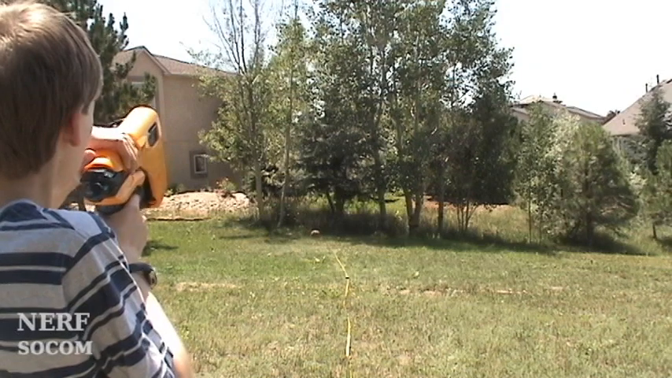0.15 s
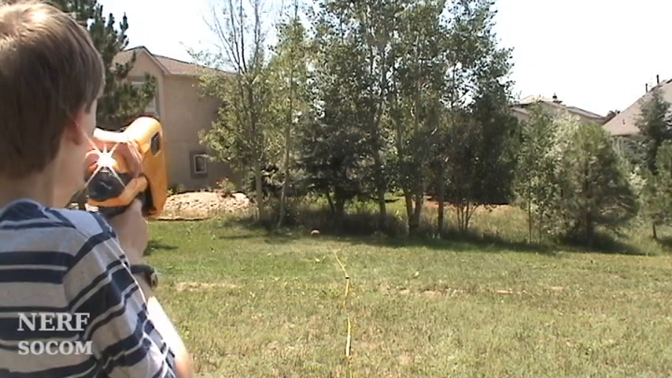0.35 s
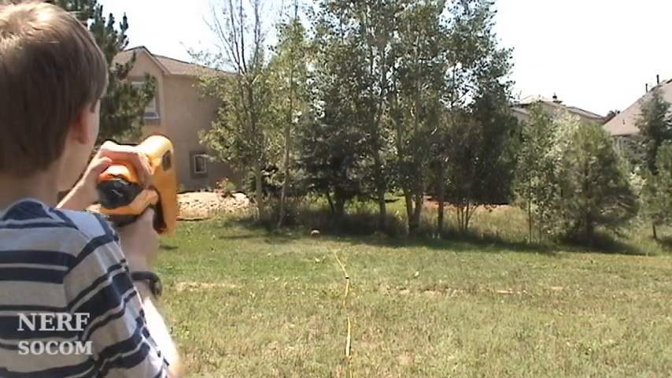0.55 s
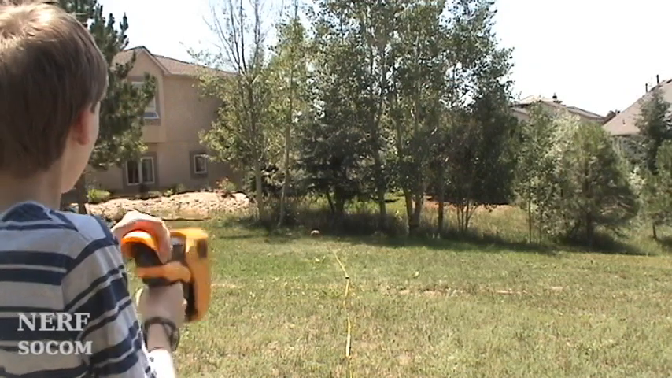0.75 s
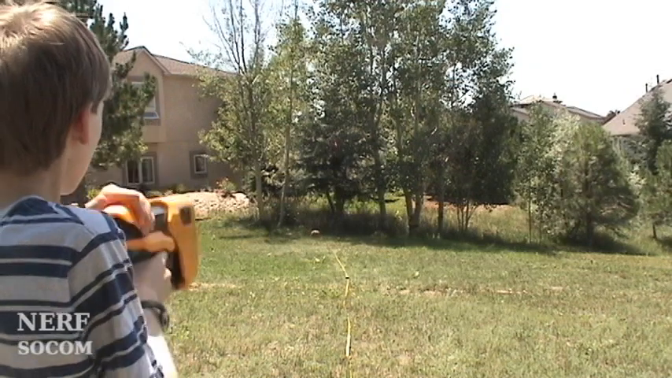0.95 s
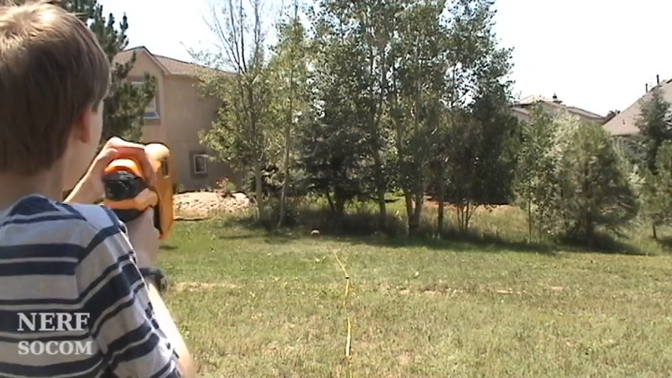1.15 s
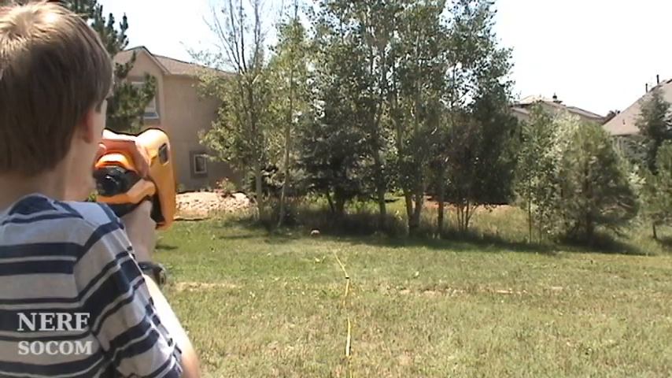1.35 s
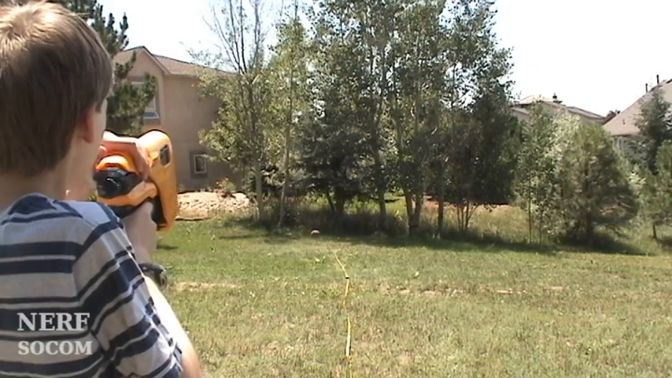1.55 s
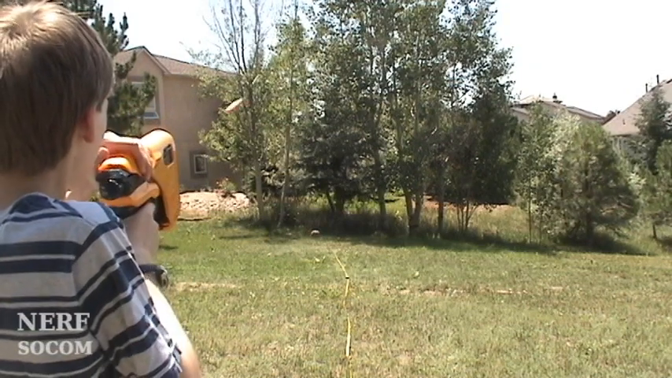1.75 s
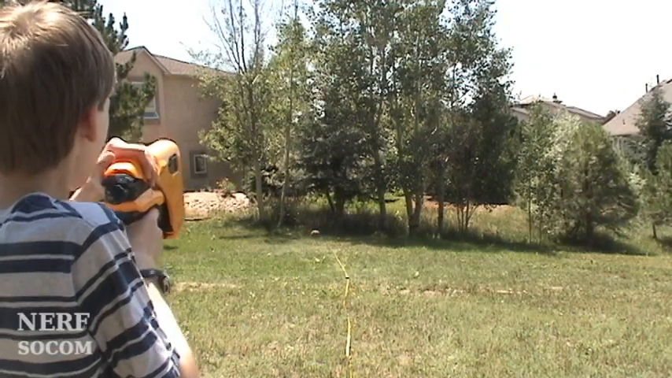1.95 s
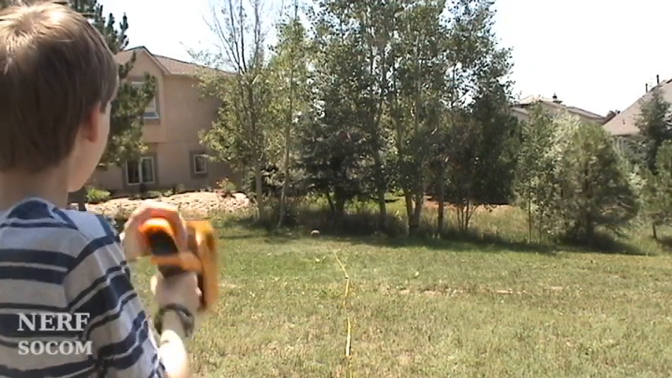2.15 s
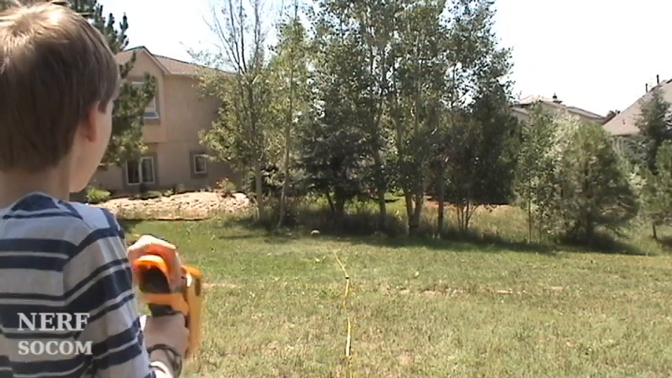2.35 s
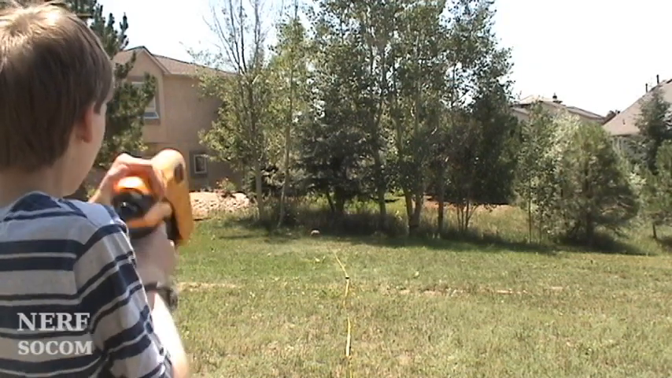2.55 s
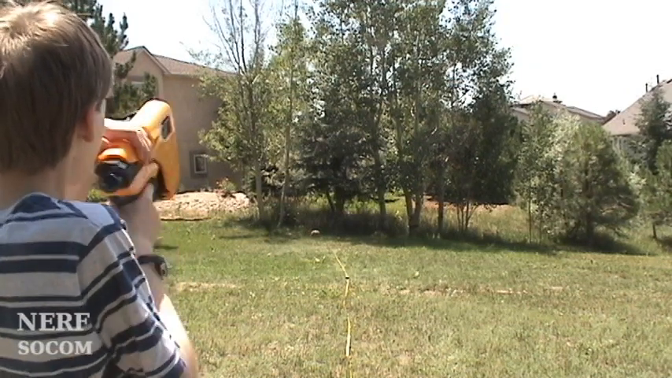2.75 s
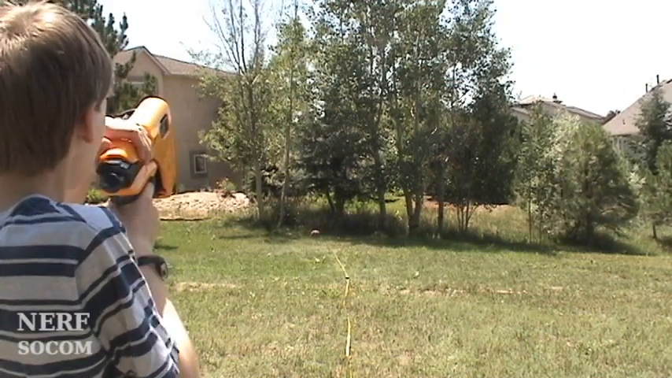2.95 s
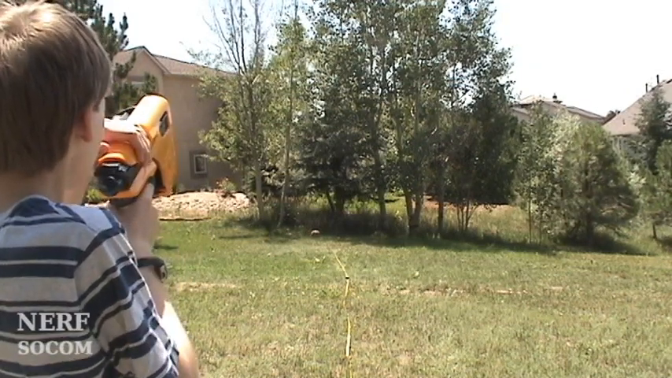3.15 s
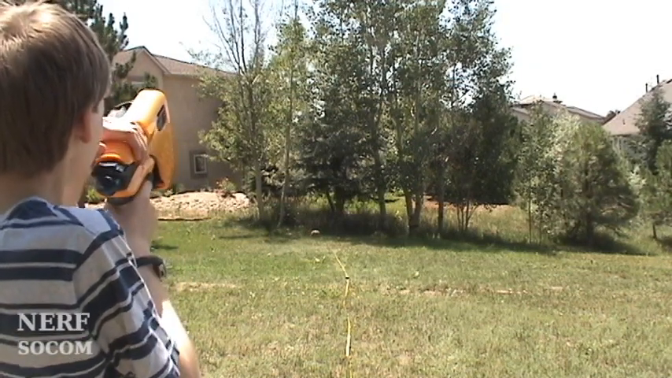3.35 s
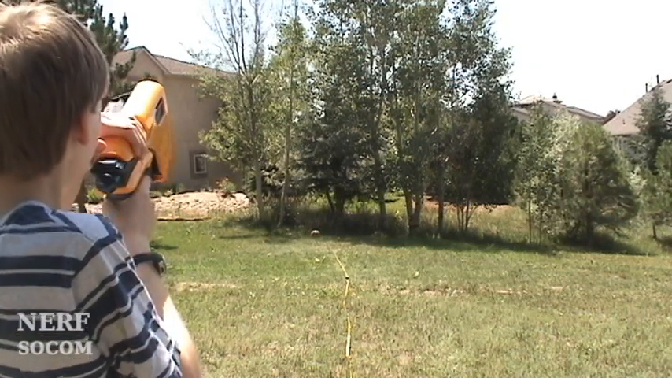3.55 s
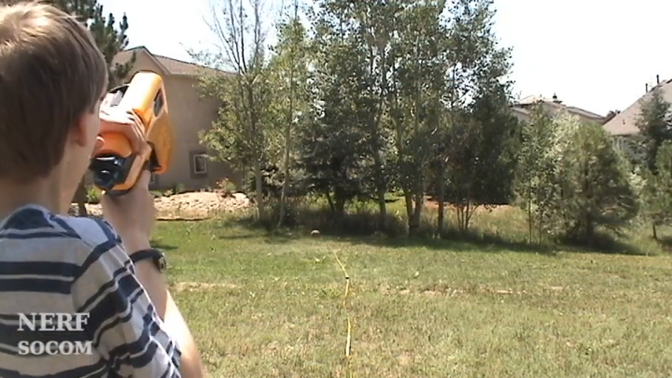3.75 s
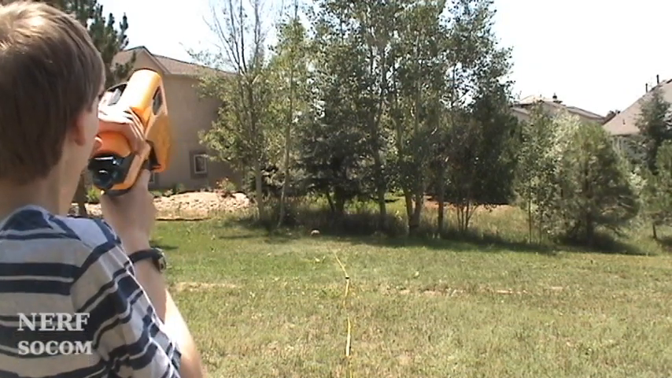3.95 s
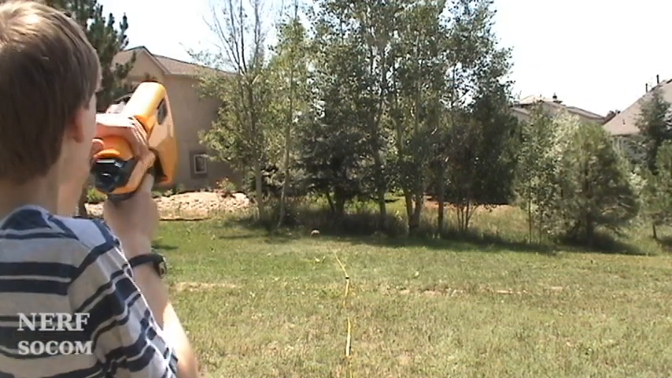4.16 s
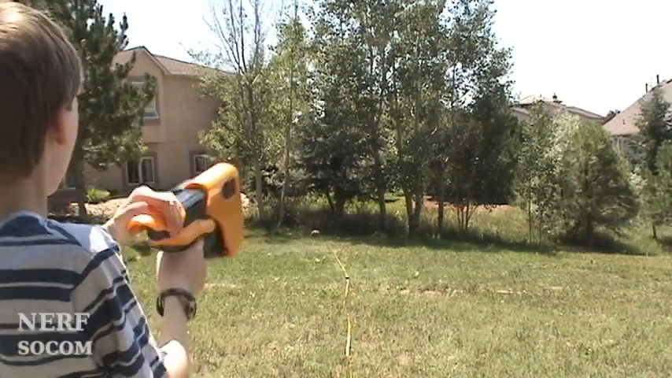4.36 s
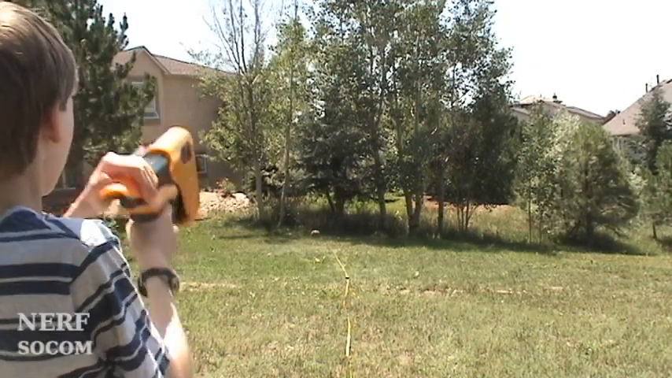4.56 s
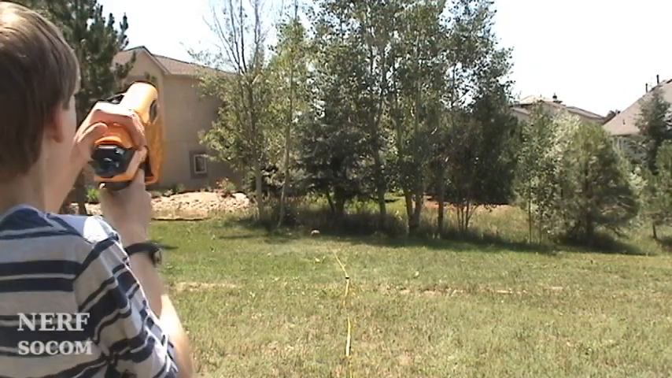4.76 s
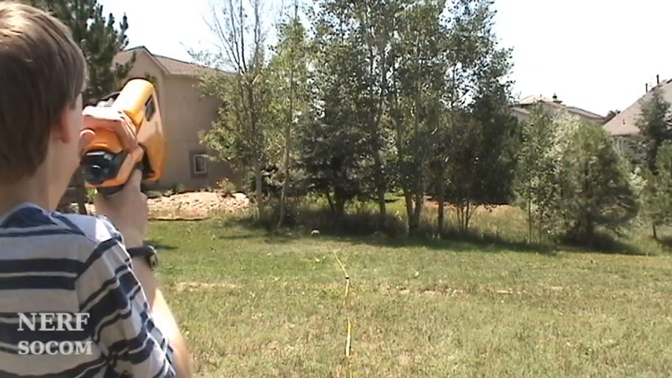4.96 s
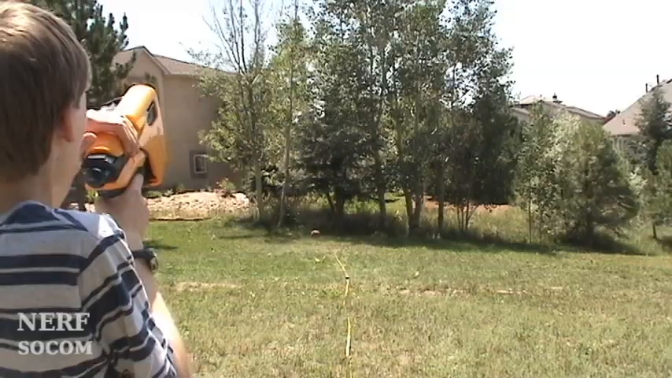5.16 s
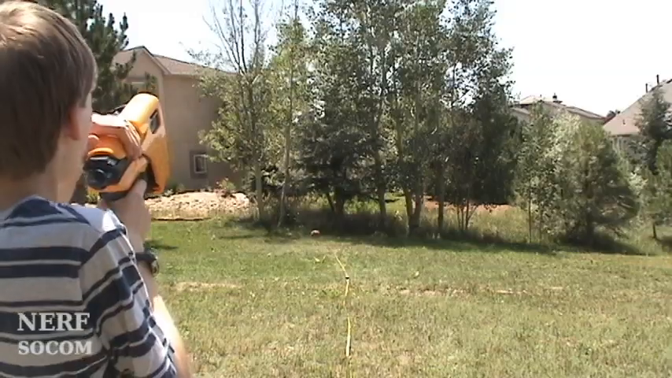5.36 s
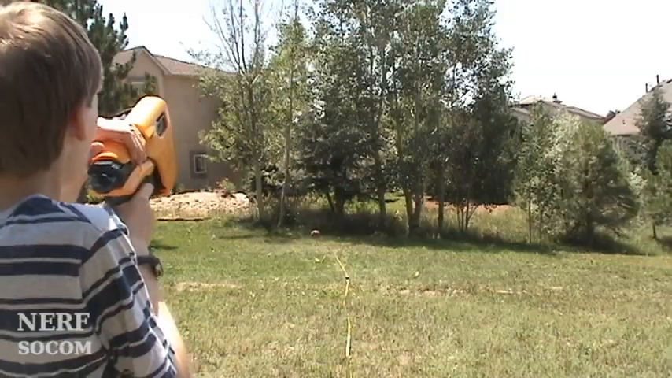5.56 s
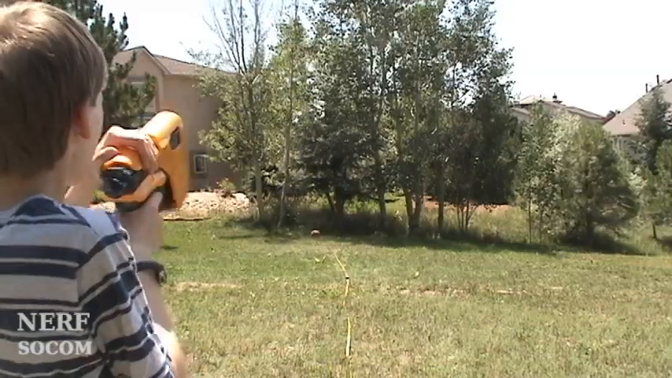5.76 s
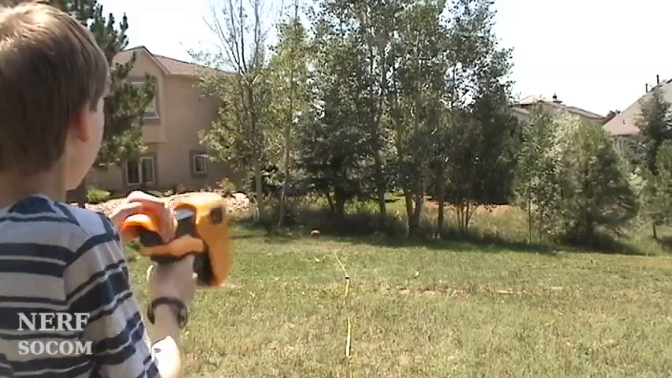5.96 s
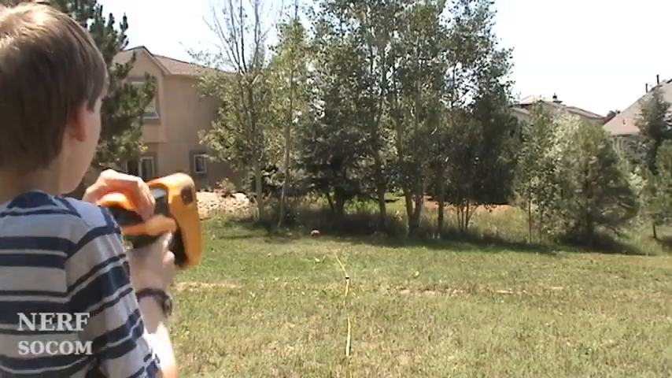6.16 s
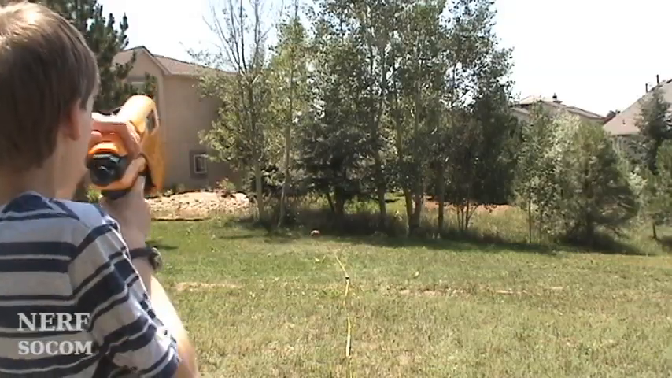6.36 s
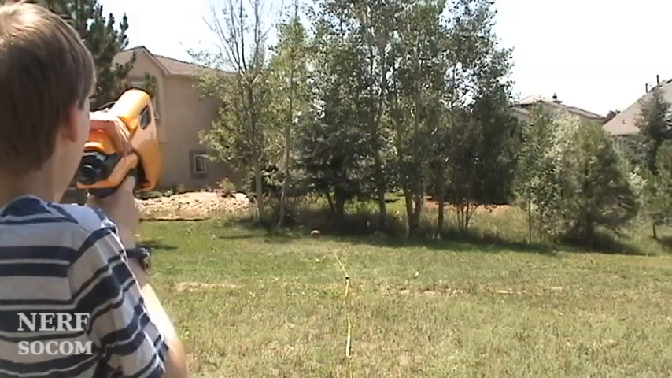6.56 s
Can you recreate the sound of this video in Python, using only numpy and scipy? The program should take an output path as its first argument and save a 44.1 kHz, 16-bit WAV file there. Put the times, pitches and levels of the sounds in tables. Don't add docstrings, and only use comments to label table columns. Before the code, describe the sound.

Outdoors on a grassy yard, a hollow toy blaster snaps hard, its trigger clicks free, and the slide ratchets back and then forward with rattling plastic scrapes and stops. The cycle happens four times, with a longer quiet pause after the second. Some foam darts leave a very faint wavering whistle. Close camera microphone, low wind buffeting, distant engine rumble, a soft fan-like drone and light hiss.

```python
import sys
import numpy as np
from scipy import signal
from scipy.fft import rfft, irfft
from scipy.io import wavfile
from scipy.ndimage import uniform_filter1d

SR = 44100
rng = np.random.default_rng(int(sys.argv[2]) if len(sys.argv) > 2 else 0)


def transcribe(u):
    v = np.clip(np.atleast_2d(u).T, -1, 1)
    q = np.round(v * 32767).astype(np.int16)
    wavfile.write(sys.argv[1], SR, q)


def makeup_ratio(level_db):
    decades = np.asarray(level_db, float) / 20
    return 10 ** decades


N = 291060

# release in seconds, crack in dB, shell in dB, hiss in dB.
SHOTS = [
    (0.2086, -11, -18.5, -47),
    (1.7272, -9, -11.5, -49),
    (3.8741, -9.5, -13, -49),
    (5.4958, -9.5, -10.5, -51),
]
# hand grabs, slide meets the spring, slide hits the stop, all in seconds.
PULLS = [
    (0.612, 0.666, 0.709),
    (2.132, 2.168, 2.2007),
    (4.263, 4.311, 4.353),
    (5.826, 5.873, 5.9197),
]
# hand grabs, slide meets the drum, slide hits the stop, all in seconds.
PUSHES = [
    (1.008, 1.039, 1.09),
    (2.507, 2.534, 2.5758),
    (4.623, 4.654, 4.6924),
    (6.2065, 6.229, 6.2779),
]
# time in seconds, click in dB, edges in dB.
LET_GO = [
    (0.381, -29.5, -43),
    (1.886, -31.5, -45),
    (4.0252, -24, -36),
    (5.698, -23.5, -30.5),
]
CREEP_S, OVERRUN_S = 0.032, 0.0053
BITE_S = 0.009


def unit(x):
    return x / np.sqrt(np.mean(x ** 2))


def colour(x, points):
    size = 8192
    hz, db = np.transpose(points)
    bins_hz = np.arange(size // 2 + 1) * SR / size
    log_gain = np.interp(np.log(bins_hz + 1), np.log(hz), db) * np.log(10) / 20
    cepstrum = irfft(log_gain)
    cepstrum[1:size // 2] *= 2
    cepstrum[size // 2 + 1:] = 0
    response = irfft(np.exp(rfft(cepstrum)))
    return signal.fftconvolve(x, response)[:len(x)]


def resonate(x, hz, width_hz):
    return signal.lfilter(*signal.iirpeak(hz, hz / width_hz, SR), x)


def walk(rate):
    hold = int(SR / rate)
    steps = np.repeat(rng.standard_normal(N // hold + 1), hold)
    return unit(uniform_filter1d(uniform_filter1d(steps, hold), hold)[:N])


def played(tables, silent):
    t = np.arange(N) / SR
    out = np.outer(silent, np.ones(N))
    for rows in tables:
        s, *columns = np.transpose(rows)
        inside = (t >= s[0]) & (t <= s[-1])
        out[:, inside] = [np.interp(t[inside], s, c) for c in columns]
    return out


def add(track, s, sound):
    start = int(s * SR)
    track[start:start + len(sound)] += sound[:N - start]


def ring(t60, rise_s):
    t = np.arange(int(.12 * SR)) / SR
    return (1 - np.exp(-t / rise_s)) * np.exp(-np.log(1000) * t / np.clip(t60, .004, .2))


def blaster():
    # frequency in Hz, level in dB.
    panel_tint = [(900, -6), (1300, -0.5), (1900, -1), (2700, 1), (3300, -1), (4200, -8), (5200, -28),
                  (6500, -61)]
    edge_tint = [(4500, -68), (5800, -22), (7000, -5), (8600, 3), (10000, 4), (11800, 5), (13500, -2),
                 (15500, -3.5), (17500, -20)]
    # frequency in Hz, width in Hz, level in dB.
    panel_modes = [(1316, 280, -7.5), (1640, 70, -7.5), (1880, 290, -7), (2690, 62, -14), (3152, 220, -14),
                   (3430, 68, -14)]
    shell_modes = [(450, 67, -8), (580, 86, 5.5), (714, 135, -3.5), (1030, 37, -10)]
    # frequency in Hz, level in dB.
    padded = [(700, 5), (1800, 0), (4500, -4)]

    slips = strokes() * makeup_ratio(2.2 * walk(330) + .8)
    grains = rng.standard_normal((3, N)) * makeup_ratio(1.05 * rng.exponential(size=(3, N)))
    hits, blows = strikes()
    panel_hits, edge_hits = ticks(hits)
    panel_touches, edge_touches = ticks(handling(), slow=1.3)

    panel_gain = 1 / np.std(colour(grains[0], panel_tint))
    edge_gain = 1 / np.std(colour(grains[1], edge_tint))
    touched = colour(grains[0] * panel_touches, padded)
    panels = panel_gain * colour(grains[0] * (slips[0] + panel_hits) + touched, panel_tint)
    modes = sum(makeup_ratio(db) * resonate(panels, hz, width) for hz, width, db in panel_modes)
    panels = makeup_ratio(-3) * (.75 * panels + 1.6 * modes)
    edges = edge_gain * colour(grains[1] * (slips[1] + edge_hits + edge_touches), edge_tint)

    push = unit(grains[2]) * (slips[2] * makeup_ratio(12) + (panel_hits + panel_touches) * makeup_ratio(10.5))
    shell = sum(makeup_ratio(db) * resonate(push, hz, width) for hz, width, db in shell_modes)
    shell = shell + makeup_ratio(3) * resonate(push, 460, 16)
    shell = colour(shell, [(150, -36.0), (330, -1.0), (420, -0.5)])
    return panels + edges + shell + thuds(blows)


def strikes():
    # time in seconds, panels in dB, edges in dB.
    catches = [(0.2198, -13.5, -24), (0.2502, -34, -28), (0.6233, -28, -24.5), (0.6384, -27, -29),
               (0.6725, -28, -28), (0.7026, -37, -18), (0.727, -27, -64), (0.9971, -36, -48),
               (1.039, -26, -30), (1.0535, -14, -27), (2.209, -18, -24), (2.1548, -20, -27),
               (2.164, -22, -32), (2.173, -29, -21), (2.493, -31, -45), (2.524, -27, -36),
               (2.5494, -28, -31), (3.913, -38, -32), (4.2735, -26, -21.5), (4.312, -15, -22),
               (4.322, -22, -12), (4.3413, -18, -13), (4.3445, -15, -26), (4.367, -27, -37),
               (4.637, -30, -29), (5.847, -21, -28), (5.881, -23, -21), (5.9088, -22, -16),
               (6.234, -24, -31), (6.2729, -19, -18)]
    # time in seconds, peak in dB, pitch in Hz.
    knocks = [(0.222, -20, 570), (3.8868, -18, 400), (1.736, -19, 430), (0.2485, -19.5, 446),
              (0.6477, -20.5, 640), (0.6701, -24, 745), (0.8712, -33, 480), (1.0554, -20, 760),
              (1.7396, -16, 813), (2.1429, -26, 660), (2.1682, -14.5, 482), (2.2259, -27, 684),
              (2.3602, -36, 485), (2.54, -21, 553), (2.5484, -17.5, 440), (2.567, -15, 474),
              (4.2861, -20, 625), (4.2986, -21, 595), (4.3144, -15, 710), (4.6367, -20.5, 580),
              (4.6658, -12.5, 634), (5.8365, -25, 465), (5.8583, -20, 646), (5.874, -16, 549),
              (5.9094, -16, 562), (5.9782, -27, 640), (5.9952, -24, 484), (6.2375, -23, 490),
              (6.2486, -18, 650), (6.2584, -17, 622)]
    # seconds after release, panels and edges in dB over the crack.
    shot_strikes = [
        (0, -4, 0),
        (0.0055, -1.5, -1.5),
        (0.0142, 2.5, -5),
        (0.028, -5.5, -8),
    ]
    # seconds after release, dB over the shell level, pitch in Hz.
    shot_blows = [
        (0.012, -6, 620),
        (0.021, 2.5, 570),
    ]
    stop_edge_db, stop_shell_db = -6, -17.5
    chatter_db, scatter_db, chatter_edge_db, chatter_shell_db = 1, 4, 2, -7

    hits, blows = list(catches), list(knocks)
    for s, crack_db, shell_db, _ in SHOTS:
        hits += [(s + late, crack_db + panel_db, crack_db + edge_db) for late, panel_db, edge_db in shot_strikes]
        blows += [(s + late, shell_db + db, hz) for late, db, hz in shot_blows]
    for (grab, load, stop), (glide_db, load_db, stop_db, stop_hz), stages, hand, latch in slides():
        latch_s = stop - latch[0]
        hits += [(grab, *hand[:2]), (latch_s, *latch[1:3]), (stop, stop_db, stop_db + stop_edge_db)]
        blows += [(grab + 0.00174, *hand[2:]), (latch_s, *latch[3:]), (stop, stop_shell_db, stop_hz)]
        for place, size, tone in rng.random(size=(12, 3)):
            s = grab - CREEP_S + place * (stop - grab + CREEP_S)
            first, last, treble, _ = stages[int(s > grab) + int(s > load)]
            effort_db = load_db if s > load else glide_db
            db = effort_db + (first + last) / 2 + chatter_db + scatter_db * (2 * size - 1)
            hits += [(s, db, db + treble + chatter_edge_db)]
            blows += [(s + 0.00202, db + chatter_shell_db, np.interp(tone, [0, 1], (465, 748)))]
    return hits, blows


def ticks(hits, slow=1):
    t60_s = 0.011
    panels, edges = np.zeros(N), np.zeros(N)
    for s, panel_db, edge_db in hits:
        soft = slow * np.clip((-26 - panel_db) / 9, 1, 2.5)
        add(panels, s, makeup_ratio(panel_db - 0.5) * ring(1.47 * soft * t60_s, 0.001 * soft ** 2))
        add(edges, s, makeup_ratio(edge_db - 1.5) * ring(soft * t60_s, .0001 * soft ** 2))
    return panels, edges


def thuds(blows):
    thud_t60_s = 0.028
    slam_late_s, slam_db, slam_hz, slam_t60_s = 0.0126, -7.5, 206, 0.046
    bump_db, bump_hz, bump_t60_s = -27, 250, 0.041
    out, t = np.zeros(N), np.arange(int(.12 * SR)) / SR
    chance = rng.random((len(blows), 2))
    for (s, db, hz), (spread, sign) in zip(blows, chance):
        upper_hz = (1.254 + 0.41 * spread) * hz
        pair = np.sin(2 * np.pi * hz * t) + 0.47 * np.sin(2 * np.pi * upper_hz * t)
        add(out, s, np.sign(sign - .5) * makeup_ratio(db + 6.0) * ring(thud_t60_s, 0.0013) * pair)
    slam = np.sin(2 * np.pi * slam_hz * t) + 0.35 * np.sin(.9 * np.pi * slam_hz * t)
    slam = ring(slam_t60_s, 0.0045) * slam
    for s, _, shell_db, *_ in SHOTS:
        add(out, s + slam_late_s, makeup_ratio(shell_db * 0.74 + slam_db - 1) * slam)
    jolt = makeup_ratio(bump_db) * ring(bump_t60_s, 0.0031) * np.sin(2 * np.pi * bump_hz * t)
    for *_, stop in PULLS + PUSHES:
        add(out, stop - 0.006, jolt)
    return out


def slides():
    # glide in dB, load in dB, stop in dB, stop pitch in Hz.
    pull_effort = [
        (-34, -22.5, -8.5, 523),
        (-32, -21.5, -8.5, 430),
        (-31.5, -23, -23, 640),
        (-31.5, -24.5, -14.5, 596),
    ]
    push_effort = [
        (-34.5, -24.5, -10, 427),
        (-36, -22.5, -10.5, 530),
        (-33.5, -20.5, -12, 596),
        (-34, -25.5, -6.5, 550),
    ]
    # first and last dB over the effort, treble share in dB, shell share in dB.
    pull_stages = [
        (-27.5, -19, -18, 5.5),
        (-4, 3.5, -12, 0),
        (-1, 0, -8.5, 2.5),
    ]
    push_stages = [
        (-16, -6, -15.5, 7),
        (-3, 0, -16, 6),
        (0, 0, -10, -2),
    ]
    # panels in dB, edges in dB, shell in dB, pitch in Hz.
    pull_grab = (-31, -30, -42, 696)
    push_grab = (-25, -46, -21, 572)
    # seconds before the stop, panels, edges and shell in dB, pitch in Hz.
    pull_latch = (0.0649, -21, -20, -16.5, 587)
    push_latch = (0.0456, -8, -28, -11, 598)
    pulls = [(*row, pull_stages, pull_grab, pull_latch) for row in zip(PULLS, pull_effort)]
    pushes = [(*row, push_stages, push_grab, push_latch) for row in zip(PUSHES, push_effort)]
    return pulls + pushes


def strokes():
    # from and to in seconds after release, first and last dB, treble share in dB.
    shot_rattle = [
        (0, 0.01, -35.5, -29, 2),
        (0.01, 0.023, -26, -26, 0.5),
    ]
    puff_shell_db, clatter_shell_db = -6, 7
    bite_db, stop_t60_s = -9, .036
    parts = []
    for s, *_ in SHOTS:
        for a, b, first, last, treble in shot_rattle:
            parts += [(s + a, s + b, first, last, treble, clatter_shell_db if a > 0 else puff_shell_db)]
    for (grab, load, stop), (glide_db, load_db, *_), stages, *_ in slides():
        starts, ends = [grab - CREEP_S, grab, load + BITE_S], [grab, load, stop + OVERRUN_S]
        efforts = [glide_db, glide_db, load_db]
        first, _, *shares = stages[2]
        parts += [(load, load + BITE_S, load_db + first + bite_db, load_db + first, *shares)]
        for a, b, db, (first, last, *shares) in zip(starts, ends, efforts, stages):
            parts += [(a, b, db + first, db + last, *shares)]
    force = np.zeros((3, N))
    for start, end, first_db, last_db, treble_db, shell_db in parts:
        t = np.arange(int((end - start + .08) * SR)) / SR
        db = np.interp(t, [0, end - start], [first_db, last_db])
        db = db - 60 * np.maximum(t + start - end, 0) / stop_t60_s
        span = force[:, int(start * SR):int(start * SR) + len(t)]
        span[:] = np.maximum(span, makeup_ratio(db + np.array([[0], [treble_db], [shell_db]])))
    return force


def handling():
    # time in seconds, panels in dB, edges in dB.
    touches = [(0.203, -16, -43), (0.244, -23, -28), (0.257, -24, -34), (2.31, -35, -54),
               (0.4398, -32, -58), (0.473, -36, -50), (0.511, -30.5, -53), (0.557, -35, -53),
               (0.59, -44, -58), (0.862, -29.5, -79), (1.4644, -35.5, -50), (1.676, -25.5, -35.5),
               (1.9633, -34, -50.5), (2.119, -31, -55), (2.392, -37, -51), (2.778, -39, -53),
               (3.8143, -25.5, -40), (3.836, -23.5, -40), (4.24, -45, -55), (4.4897, -29, -51),
               (4.4988, -27.5, -47), (4.537, -33, -48), (4.6104, -34, -46), (5.3345, -37, -57),
               (5.813, -40.5, -47.5), (5.965, -36, -53), (5.975, -19.5, -35), (5.985, -23, -48),
               (5.9936, -17.5, -28.5), (6.1125, -42, -66)]
    rustle_s, rustle_db, scatter_db, rustle_edge_db = 0.24, -48.5, 3.5, -20
    soft = touches + LET_GO
    for (*_, stop), *_ in slides():
        for place, size in rng.random(size=(6, 2)):
            db = rustle_db - scatter_db * np.log(size)
            soft += [(stop + OVERRUN_S + place * rustle_s, db, db + rustle_edge_db)]
    return soft


def darts():
    # time in seconds, whistle in Hz, level in dB.
    flights = [
        [(.29, 2220, -60), (.4, 2240, -57), (.47, 2240, -61)],
        [(1.84, 2080, -55), (1.96, 2130, -58), (2.1, 2250, -64)],
        [(5.59, 2290, -58), (5.68, 2260, -58), (5.79, 2200, -62)],
    ]
    hz, db = played(flights, [2200, -120])
    tone = np.sin(2 * np.pi * np.cumsum(hz * (1 + .005 * walk(90))) / SR)
    return uniform_filter1d(makeup_ratio(db + 3 * walk(45)), size=400) * tone


def leak():
    # frequency in Hz, level in dB.
    hiss_tint = [(2500, -30), (5500, -24), (7000, -8), (9500, 0), (12000, -3), (16000, -12)]
    late_s, longest_s = 0.034, 0.165
    drop_db, fall_s, sag_db_per_s = -9.5, 0.046, -82
    curves = []
    for (s, *_, hiss_db), (go_s, *_) in zip(SHOTS, LET_GO):
        start, end = s + late_s, min(go_s, s + longest_s)
        settled_db = hiss_db + drop_db
        end_db = settled_db + sag_db_per_s * (end - start - fall_s)
        curves.append([(start, hiss_db), (start + fall_s, settled_db), (end, end_db)])
    db, = played(curves, [-120])
    sputter = uniform_filter1d(makeup_ratio(db + 1.2 * walk(120)), size=200)
    return sputter * unit(colour(rng.standard_normal(N), hiss_tint))


def scatter(noise, t60, db, tint):
    t = np.arange(len(noise)) / SR
    decay = noise * np.exp(-np.log(1000) * t / t60) * np.minimum(t / 0.004, 1)
    return makeup_ratio(db) * colour(decay / np.linalg.norm(decay), tint)


def garden(dry):
    # decay to -60 dB in seconds, level in dB, colour as rows of Hz and dB.
    near_scatter = (0.061, -28.5, [(200, 26), (1000, 6.5), (5000, 4.5), (16000, -31)])
    far_scatter = (0.69, -18.5, [(200, -5), (1000, 3.5), (2500, 3), (4000, 1.5), (7000, -2), (16000, -16)])
    # frequency in Hz, level in dB.
    wall_tint = [(500, -12), (1500, 0), (2600, -6), (12000, -18)]
    wall_s, smear_s, wall_db = .1165, .003, -20
    muzzle_s, aside_db, wet_side = .022, -8, 0.31
    t = np.arange(int(1.2 * SR)) / SR
    aim = np.full(N, makeup_ratio(aside_db))
    for s, *_ in SHOTS:
        aim[int(s * SR):int((s + muzzle_s) * SR)] = 1
    aimed = dry * uniform_filter1d(aim, size=200)
    wet = []
    for grass, facades, brick in rng.standard_normal((2, 3, len(t))):
        lawn, houses = scatter(grass, *near_scatter), scatter(facades, *far_scatter)
        slap = brick * (t > wall_s) * np.exp(-np.abs(t - wall_s) / smear_s)
        slap = makeup_ratio(wall_db) * colour(slap / np.linalg.norm(slap), wall_tint)
        wet.append((signal.fftconvolve(dry, lawn) + signal.fftconvolve(aimed, houses + slap))[:N])
    mid, side = wet
    return np.array([mid + wet_side * side, mid - wet_side * side])


def wind():
    # time in seconds, wind in dB, far engines in dB.
    gusts = [(0, -41, -35.5), (.13, -37.5, -45.5), (.24, -54, -38), (.29, -38.5, -53), (.37, -31.5, -41),
             (.48, -33.5, -48), (.58, -46.5, -47), (.94, -35.5, -43.5), (1.05, -44.5, -45.5),
             (2.54, -47.5, -46), (2.66, -62, -53), (2.77, -71, -38.5), (2.89, -53, -46.5), (3.67, -47, -43),
             (4.94, -50, -45.5), (5.42, -37.5, -41.5), (5.6, -47, -51), (6.6, -54, -43)]
    # frequency in Hz, level in dB.
    buffet_tint = [(8, -54), (15, 11.5), (35, 2.5), (50, -12), (100, -60)]
    engine_tint = [(25, -30.5), (45, -3), (66, 0.5), (100, -6.5), (140, -11.5), (260, -59)]
    s, *columns = np.transpose(gusts)
    gust, engines = (makeup_ratio(np.interp(np.arange(N) / SR, s, c)) for c in columns)
    tints = (buffet_tint, buffet_tint, engine_tint, engine_tint)
    left, right, mid, side = (unit(colour(rng.standard_normal(N), tint)) for tint in tints)
    buffet = np.array([makeup_ratio(-8.5) * left, makeup_ratio(3.0) * (right + 0.2 * left)])
    rumble = np.array([makeup_ratio(-1.0) * (mid + 0.47 * side), makeup_ratio(-0.3) * (mid - 0.74 * side)])
    return gust * buffet + engines * rumble


def suburb():
    # frequency in Hz, level in dB.
    murmur_tint = [(80, -42), (125, -11.5), (180, -10.5), (360, -13.5), (750, -13.5), (1000, -14),
                   (1500, -21), (2700, -29), (3800, -36), (5000, -44), (5800, -54), (7000, -43),
                   (10100, -36.5), (15000, -34.5)]
    murmur_db = -49.5
    hum_hz, hum_width_hz, hum_db = 149.2, 10.5, -55
    mid, side = (unit(colour(rng.standard_normal(N), murmur_tint)) for _ in range(2))
    side = colour(side, [(150, -2.0), (500, -8.5), (3000, -4.5), (10000, -0.5)])
    drone = resonate(rng.standard_normal(N), hum_hz, hum_width_hz)
    drone = unit(resonate(drone, hum_hz, hum_width_hz))
    hum = makeup_ratio(hum_db + 0.88 * walk(4.67)) * drone
    return makeup_ratio(murmur_db + 0.55 * walk(2.36)) * np.array([mid + side, mid - side]) + hum


def scene():
    # frequency in Hz, left over right in dB.
    lean = [(300, 1.4), (700, 1.7), (2000, 1), (5000, 1.7), (9000, 2.3), (14000, 4.9)]
    toy = blaster() + darts() + leak()
    near = np.array([colour(toy, [(hz, sign * db / 2) for hz, db in lean]) for sign in (1, -1)])
    return near + garden(toy) + wind() + suburb()


def top_cut(x):
    return signal.sosfilt(signal.butter(12, 17060, fs=SR, output="sos"), x)


def record(dry):
    ceiling, top_hz = .68, 15800
    soft = ceiling * np.tanh(1.036 * dry / ceiling)
    low_pass = signal.ellip(8, .5, 42, top_hz, fs=SR, output="sos")
    mix = signal.sosfilt(low_pass, soft)
    return top_cut(mix)


dry = scene()
out = record(dry)
transcribe(out)
```